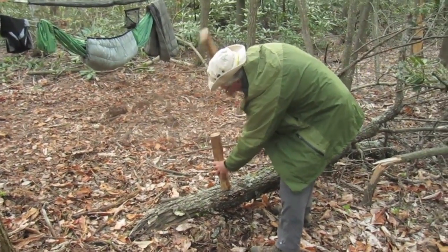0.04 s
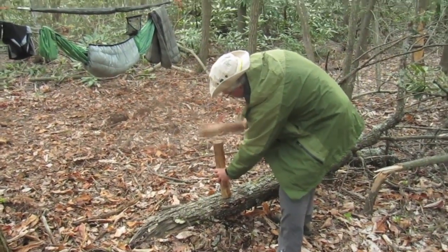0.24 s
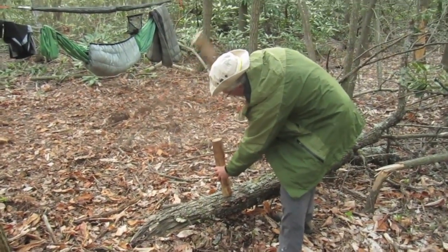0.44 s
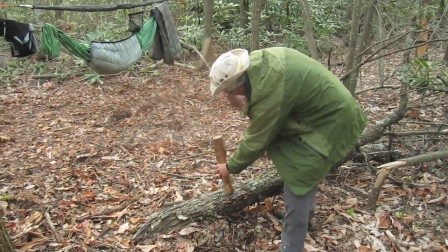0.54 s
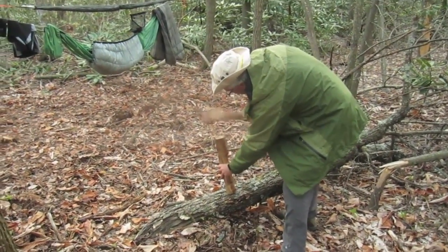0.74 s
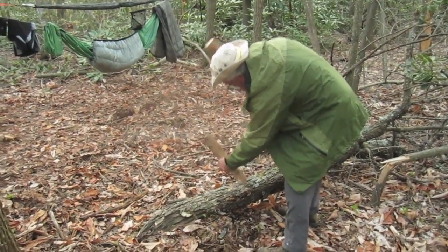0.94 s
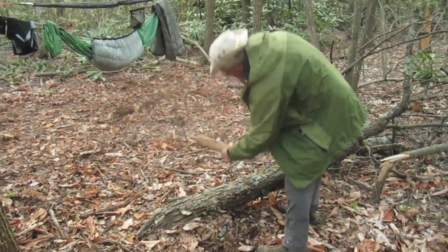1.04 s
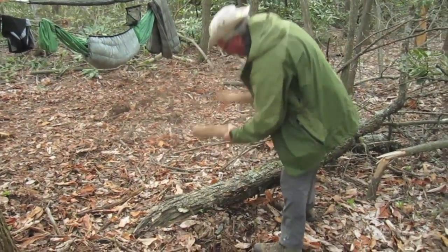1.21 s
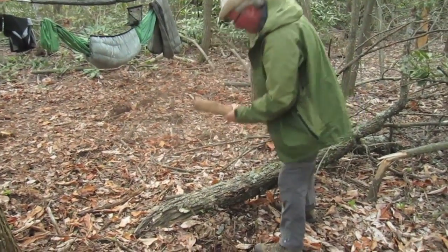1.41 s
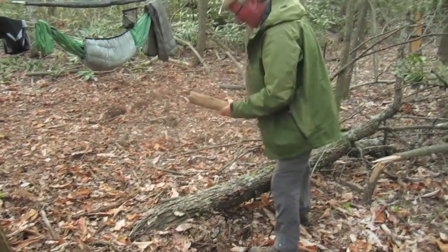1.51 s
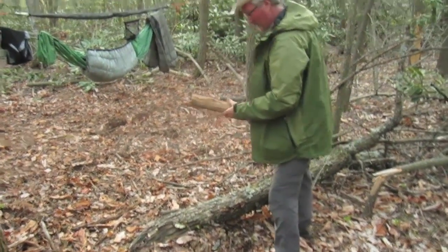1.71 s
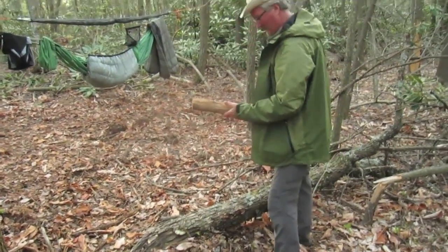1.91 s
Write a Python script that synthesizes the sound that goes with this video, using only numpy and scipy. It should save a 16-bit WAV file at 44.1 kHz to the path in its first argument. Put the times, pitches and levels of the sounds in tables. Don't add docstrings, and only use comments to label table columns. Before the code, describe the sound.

Two hard cracks of wood on wood, under half a second apart, overload a close microphone in a leafy wood; each echo swells and dies, leaving faint hush, cloth rustle, twig snaps and a soft wooden tap.

```python
import sys
import numpy as np
from scipy import signal
from scipy.io import wavfile

SR = 44100
rng = np.random.default_rng(int(sys.argv[2]) if len(sys.argv) > 2 else 0)


def bounce(signal):
    frames = np.transpose(np.atleast_2d(signal))
    limited = np.clip(frames, -1, 1)
    pcm = np.round(limited * 32767).astype(np.int16)
    wavfile.write(sys.argv[1], SR, pcm)


def makeup_ratio(level_db):
    decades = np.asarray(level_db, float) / 20
    return 10 ** decades


N = 85995
LEAD = SR // 2


def in_time(rows, count=N):
    return np.interp(np.arange(count) / SR, *np.transpose(rows))


def at_hz(points, hz):
    points = np.array(points)
    return np.interp(np.log(hz), np.log(points[:, 0]), points[:, 1])


def rms_one(x):
    return x / np.sqrt(np.mean(x ** 2) + 1e-20)


def drift(rate_hz, count=N):
    pole = np.exp(-80 * np.pi * rate_hz / SR)
    chance = rng.standard_normal(count // 40 + 2002)
    slow = signal.lfilter([1], [1, -2 * pole, pole * pole], chance)[2000:]
    return np.interp(np.arange(count) / 40, np.arange(len(slow)), rms_one(slow))


def ring(clicks, hz, t60_s):
    pole, turn = makeup_ratio(-60 / (t60_s * SR)), 2 * np.pi * hz / SR
    return signal.lfilter([0, np.sin(turn)], [1, -2 * pole * np.cos(turn), pole * pole], clicks + 1e-18)


def band_pass(x, order, low_hz, high_hz):
    return signal.sosfilt(signal.butter(order, [low_hz, high_hz], "band", fs=SR, output="sos"), x)


def bands(source, gain_db):
    edges = 22 * 2 ** np.arange(0, 9.6, .5)
    total = 0
    for k, (low, high) in enumerate(zip(edges, edges[1:])):
        gain = makeup_ratio(gain_db(np.sqrt(low * high)))
        total = total + gain * band_pass(source[k % 2], 2, low, high)
    return total


# start_s, level_db, rebound_after_s, rebound_db
BLOWS = [
    (-.26, -13, 0.0028, -10),
    (0.2114, 2.5, 0.0024, -10.5),
    (0.677, 4, 0.00144, -20),
]
GLANCING = [0, 0, 1]
# pitch_hz, t60_s, centred_db, glancing_db, extra_towards_trees_db
WOOD = [(294, 0.014, -4, -14, -3), (642, 0.025, -6, -5.5, -4.5), (717.5, 0.014, -2, -0.5, -11.5),
        (845.5, 0.066, -13.5, -18.5, 6.5), (1021, 0.043, -6.5, -9, 4), (1020, 0.0045, 6.5, 5, 0.5),
        (1482, 0.013, 1.5, -2, -2.5), (1593, 0.01, -4, 0.5, -2.5), (1927, 0.021, -12, -19, 9),
        (2106, 0.011, -3, -8.5, 1.5), (2565, 0.013, -10, -6, 2), (3053, 0.004, -4.5, -2.5, 0.5),
        (3623, 0.0086, -6, -12.5, -21), (5800, 0.0071, -13.5, -14, -11)]
LONG_MODES = (3, 4)


def blows():
    touch_lead_s, touch_db, contact_hz = .0004, -29.5, 6000
    crack_db, crack_t60_s, crack_hz = -14.5, 0.019, 4630
    thud_db, thud_hz, thud_t60_s = -25, 158, .025
    far_ring, far_snap_db = 1.2, 10.5
    out = np.zeros((3, N + LEAD + SR))
    t = np.arange(SR // 4) / SR
    soft = signal.butter(2, contact_hz, fs=SR)
    for (start_s, level_db, rebound_s, rebound_db), kind in zip(BLOWS, GLANCING):
        once = signal.lfilter(*soft, t == 0)
        click = np.zeros(len(t))
        click[0] = makeup_ratio(touch_db)
        click[int(touch_lead_s * SR)] = 1
        click[int(rebound_s * SR)] = makeup_ratio(rebound_db)
        click = signal.lfilter(*soft, click)

        body = np.zeros((3, len(t)))
        for k, mode in enumerate(WOOD):
            hz, t60_s, mode_db, trees_db = mode[0], mode[1], mode[2 + kind], mode[4]
            sign = (-1) ** k
            body[0] += sign * makeup_ratio(mode_db) * ring(click, hz, t60_s)
            far = ring(once, hz, far_ring * t60_s)
            body[1 + (k in LONG_MODES)] += sign * makeup_ratio(mode_db + trees_db) * far
        crack = band_pass(rng.standard_normal(len(t)), 1, crack_hz * .5, crack_hz * 2)
        crack_rise = np.minimum(t / .0006, 1)
        body[0] += crack * crack_rise * makeup_ratio(crack_db - 60 * t / crack_t60_s)
        body[0] += makeup_ratio(thud_db) * ring(click, thud_hz, thud_t60_s)
        body[1] += makeup_ratio(far_snap_db) * once

        i = int(start_s * SR) + LEAD
        out[:, i:i + len(t)] += makeup_ratio(level_db) * body
    low_cut = signal.butter(2, 173, "high", fs=SR, output="sos")
    return signal.sosfilt(low_cut, out[:, :N + LEAD])


# after_blow_s, level_db
SCATTER = [(.005, -37), (.04, -46), (.09, -40), (.125, -35.5), (.16, -40), (.25, -46), (.34, -51.5),
           (.46, -55), (.62, -70), (.9, -72)]
# pitch_hz, level_db
SCATTER_TONE = [(200, -25.5), (500, -6), (900, 3), (1500, -1), (3000, -2.5), (6000, 0.5), (12000, -3.5)]
# after_blow_s, level_db
RING_SCATTER = [(.005, -41), (.05, -41.5), (.1, -36), (.135, -38.5), (.2, -41), (.29, -46.5), (.345, -52),
                (.44, -49.5), (.62, -59.5)]
# delay_s, level_db
ECHOES = [
    (.1255, -19),
    (.1385, -25),
    (.054, -28),
]


def trunks(near, short, long):
    scatter_db, lump_db, loss_db_per_s_khz, ring_fade_db_per_s = -14.5, 1.5, 4.5, 60
    t = np.arange(SR) / SR
    lumps = drift(30, count=SR)

    def colour_db(hz):
        return at_hz(SCATTER_TONE, hz) - loss_db_per_s_khz * t * hz / 1000

    cloud = bands(rng.standard_normal((2, SR)), colour_db)
    cloud = makeup_ratio(scatter_db + lump_db * lumps) * cloud * (t > .004)
    short_path = cloud * makeup_ratio(in_time(SCATTER + [(1, -90)], count=SR))
    end_s, end_db = RING_SCATTER[-1]
    last_point = (0.91, end_db - ring_fade_db_per_s * (1 - end_s))
    long_path = cloud * makeup_ratio(in_time(RING_SCATTER + [last_point], count=SR))

    echo_path = np.zeros(SR)
    for delay_s, level_db in ECHOES:
        echo_path[int(delay_s * SR)] = makeup_ratio(level_db)
    echo_path = signal.lfilter(*signal.butter(2, [600, 1600], "band", fs=SR), echo_path)
    paths = (near, echo_path), (short, short_path), (long, long_path)
    return sum(signal.fftconvolve(x, path)[:len(x)] for x, path in paths)


# pitch_hz, level_db
AIR = [(25, -4), (130, -6), (330, -6.5), (650, -0.5), (1300, -6), (3500, -13.5), (9000, -23.5),
       (16000, -28.5)]


def air():
    together = drift(0.83)

    def level_db(hz):
        return at_hz(AIR, hz) + .5 * together + 1.04 * drift(11.8)

    return makeup_ratio(-51) * rms_one(bands(rng.standard_normal((2, N)), level_db))


# start_s, peak_db, pitch_hz, t60_s
TICKS = [
    (.158, -51, 3500, .01),
    (.37, -45, 9000, .006),
    (0.592, -46, 5500, 0.024),
    (1.086, -47, 7900, 0.0095),
    (1.184, -38.5, 3400, .006),
    (1.452, -38.5, 7600, 0.0055),
    (1.484, -42, 1200, 0.024),
    (1.524, -39, 7000, 0.0064),
    (1.385, -42, 2750, 0.032),
    (1.407, -44, 2780, 0.069),
]
# pitch_hz, t60_s, level_db
TAP = [(1200, 0.017, 1), (1670, 0.012, 0.5), (2750, .005, 7.5), (4530, 0.0035, 0.5)]


def ticks():
    tap_s, tap_db = 1.5474, -33
    tap = [(tap_s, tap_db + level_db, hz, t60_s) for hz, t60_s, level_db in TAP]
    out = np.zeros(N)
    for start_s, peak_db, hz, t60_s in TICKS + tap:
        click = np.zeros(SR // 8)
        click[0] = -makeup_ratio(peak_db)
        thin = signal.butter(1, hz / 2, "high", fs=SR)
        i = int(start_s * SR)
        out[i:i + len(click)] += signal.lfilter(*thin, ring(click, hz, t60_s))
    return out


# time_s, level_db
RUSTLE = [(0, -106), (.5, -61), (.9, -62.5), (1.1, -55), (1.25, -59), (1.42, -56.5), (1.55, -58),
          (1.75, -60.5), (1.95, -66)]
# pitch_hz, level_db
CLOTH = [(700, 1), (1400, -7.5), (3000, 3.5), (6000, -2), (9000, -0.5), (13000, -10), (16000, -14)]


def jacket():
    struck = rng.random((2, N)) < 4000 / SR
    strength = makeup_ratio(1.9 * np.minimum(rng.exponential(1, (2, N)), 5))
    grains = struck * strength * rng.choice([-1, 1], (2, N))

    def colour_db(hz):
        return at_hz(CLOTH, hz) - 30 * (hz < 600) + 1.3 * drift(28)

    clumps_db = 1.3 * drift(20)
    return makeup_ratio(in_time(RUSTLE) + clumps_db) * rms_one(bands(grains, colour_db))


def scene():
    near, short, long = blows()
    struck = (near + trunks(near, short, long))[LEAD:]
    return (struck + air() + ticks() + jacket())[None]


def top_cut(x):
    return signal.sosfilt(signal.butter(12, 16820, fs=SR, output="sos"), x)


def record(dry):
    clip_top, clip_hard = .7, 8.0
    mic_top = signal.cheby2(12, 40, 16100, fs=SR, output="sos")
    dry = signal.sosfilt(mic_top, dry)
    flat = dry / (1 + np.abs(dry / clip_top) ** clip_hard) ** (1 / clip_hard)
    trim = signal.cheby2(10, 50, 17000, fs=SR, output="sos")
    mix = signal.sosfilt(trim, flat)
    return top_cut(mix)


dry = scene()
out = record(dry)
bounce(out)
```